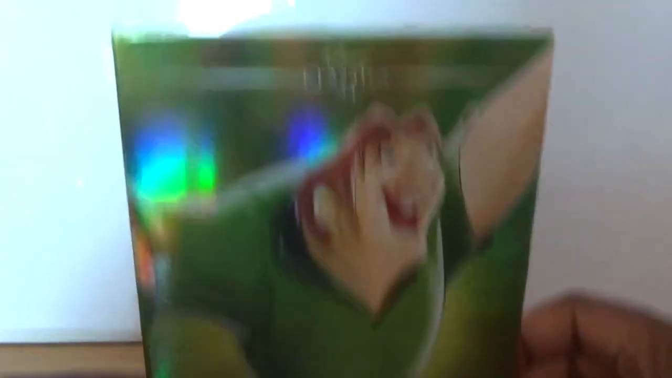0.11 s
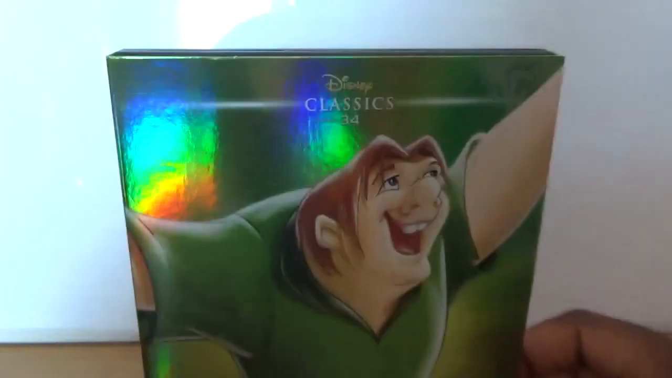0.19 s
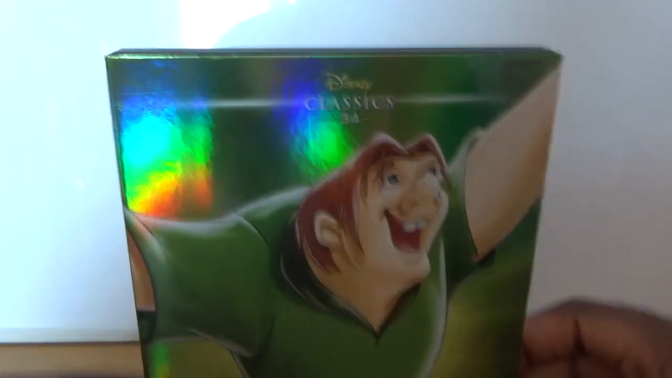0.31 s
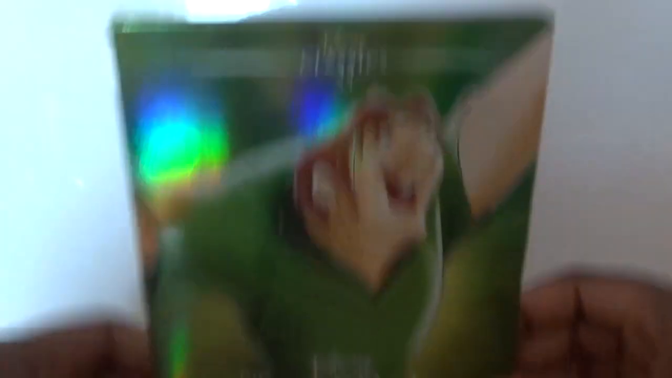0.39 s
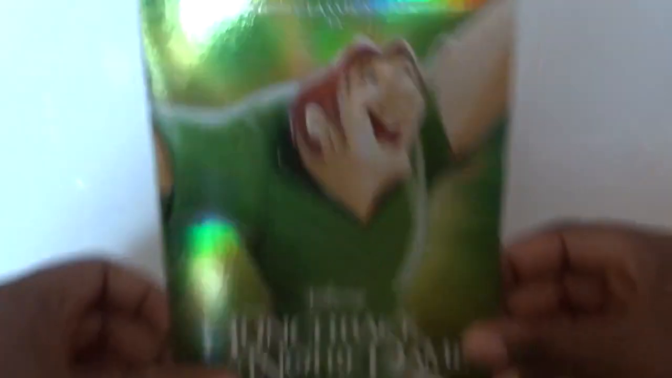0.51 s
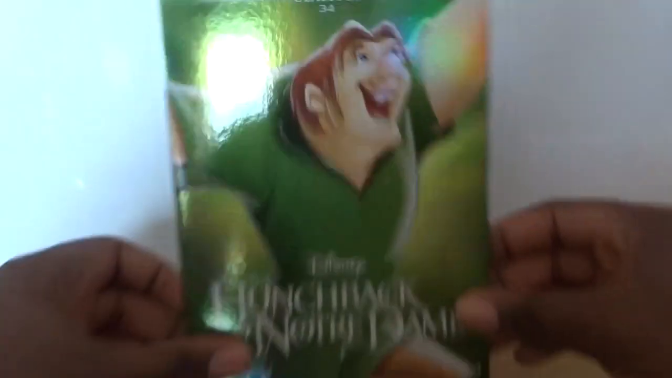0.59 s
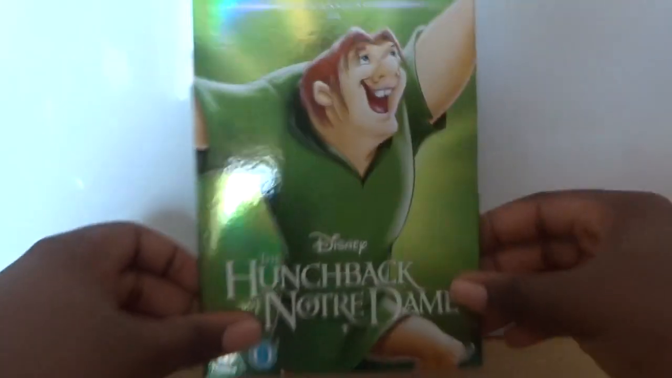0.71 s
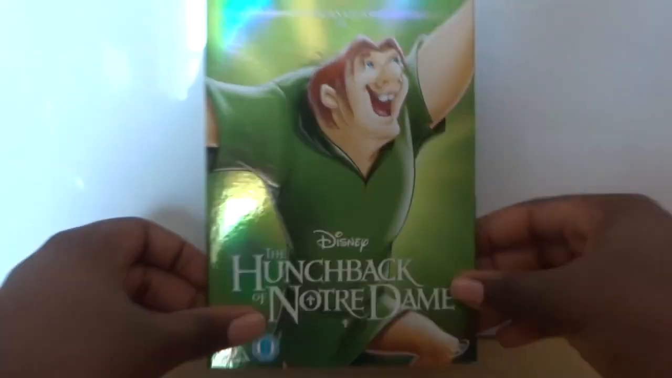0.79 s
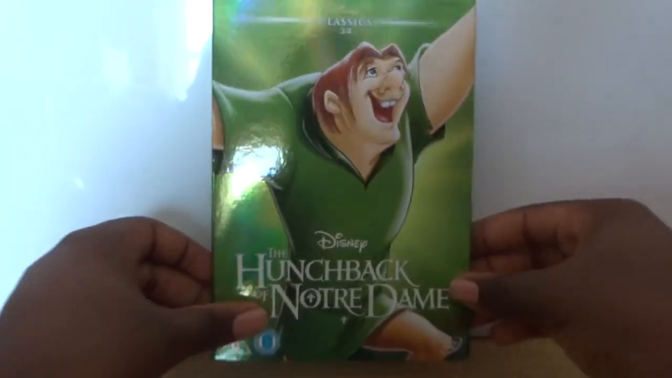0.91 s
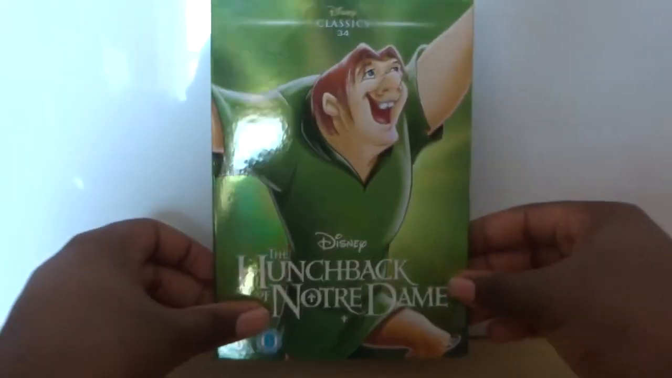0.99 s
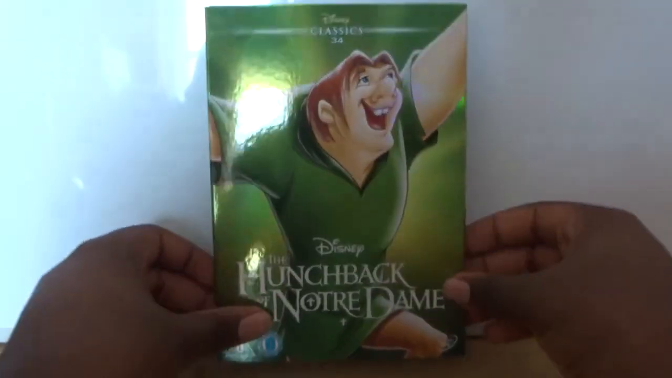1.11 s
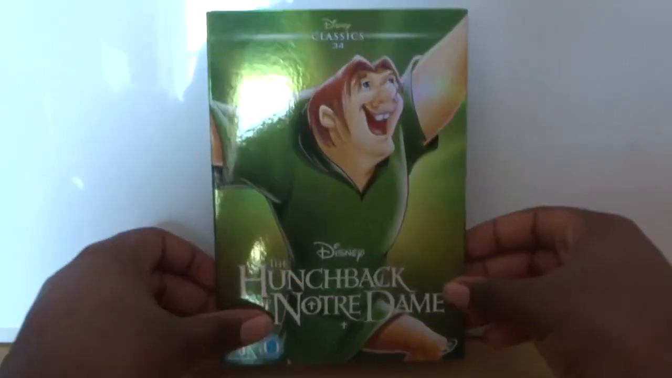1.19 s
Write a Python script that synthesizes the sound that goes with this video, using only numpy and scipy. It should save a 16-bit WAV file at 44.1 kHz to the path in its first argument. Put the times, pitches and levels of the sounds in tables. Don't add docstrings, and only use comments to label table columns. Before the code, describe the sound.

A plastic case slides into a cardboard sleeve from 0 to 0.22 s, a gritty hiss with hollow card shaking and brief squeaky edges. Hard bumps at 0.2 s lead to a loud knock on the table at 0.22 s, with clicking, rattling bounces until 0.4 s. Soft rubs fade; a finger tap comes at 0.9 s, tiny ticks at 1.0-1.2 s, over faint fan and room air, close microphone.

```python
import sys
import numpy as np
from scipy import signal
from scipy.fft import rfft, irfft
from scipy.io import wavfile
from scipy.ndimage import uniform_filter1d

SR = 44100
rng = np.random.default_rng(int(sys.argv[2]) if len(sys.argv) > 2 else 0)


def boost(x):
    u = np.asarray(x, float) / 20
    return 10 ** u


def put_to_file(sound):
    columns = np.atleast_2d(sound).T
    safe = np.clip(columns, -1, 1)
    whole_steps = np.round(safe * 32767)
    wavfile.write(sys.argv[1], SR, whole_steps.astype(np.int16))


N = 57330
T = np.arange(N) / SR

# frequency in Hz, level in dB per Hz.
AIR_COLOUR = [(15, -58.5), (25, -15), (138, 5.5), (703, -2), (884, -2.5), (1230, -7), (1510, -7.5),
              (2390, -15.5), (11000, -18), (14300, -62), (22000, -120)]
# frequency in Hz, level in dB, width in Hz.
FAN_BANDS = [(1476, -73, 42), (2110, -81.5, 30), (3280, -84, 180)]
# frequency in Hz, t60 in seconds, level in dB.
ROOM_BANDS = [(149.6, 0.73, -27.5), (397, 0.65, -31), (1080, 0.39, -9), (2482, 0.53, -9.5),
              (5500, 0.45, -8), (9500, 0.45, -7)]
# start in seconds, boom in dB, deep thud in dB.
TABLE_PUSHES = [
    (0.222, -29.5, -76),
    (0.308, -57.5, -47),
    (0.892, -54, -61),
    (0.922, -45, -59),
    (1.03, -79, -60),
    (1.189, -74, -66),
    (1.269, -54, -59),
    (1.285, -53.5, -66),
]
# frequency in Hz, level in dB, t60 in seconds.
TABLE_BOOM = [(130, 0.0013, 0.2)]
# frequency in Hz, level in dB, t60 in seconds.
TABLE_SWELL_MODES = [(116.4, -42.5, 0.08)]
# frequency in Hz, level in dB, t60 in seconds.
DEEP_THUD = [(45.74, -7, 0.12), (85, 1.5, .1)]
# start in seconds, peak in dB, pitch in Hz, t60 in seconds.
FINGER_TICKS = [(.361, -49, 4550, .1), (.783, -55.5, 1520, .029), (.893, -47, 3550, .018),
                (.8931, -35, 700, .012), (.8944, -40, 1400, .012), (.8945, -40, 720, .01),
                (.8952, -46, 5500, .012), (.8952, -46, 7330, .009), (.8954, -45, 10000, .012),
                (.8953, -48, 8600, .008), (.9, -34, 430, .0085), (.902, -49, 2200, .042),
                (.9826, -46, 1100, .006), (.9826, -48, 4200, .003), (.9827, -51, 2000, .0047),
                (.9832, -55, 3100, .019), (1.11, -55, 2234, .034), (1.11, -56, 6720, .016),
                (1.111, -58, 8600, .02), (1.113, -61, 4380, .02), (1.119, -57, 2170, .04),
                (1.1433, -46, 6200, .0017), (1.1434, -44, 4220, .0018), (1.1435, -46, 9300, .0016),
                (1.144, -58, 690, .027), (1.183, -46, 3930, .007), (1.1835, -56, 10000, .0036),
                (1.1847, -45, 6000, .0026), (1.217, -62, 3600, .0081)]
# start in seconds, peak in dB, pitch in Hz, t60 in seconds.
LID_CLICKS = [(.2488, -38, 3680, .035), (.2495, -39, 3050, .03), (.2535, -45, 4550, .05),
              (.2762, -35, 5500, .008), (.2765, -38, 3300, .015), (.277, -44, 9700, .006),
              (.2772, -45, 7900, .005), (.2775, -48, 10900, .008), (.279, -36, 2450, .035),
              (.2965, -38, 3700, .04), (.3, -37, 2900, .025), (.302, -41, 5600, .008),
              (.316, -43, 3000, .03), (.317, -44, 4800, .006), (.343, -49, 6600, .005),
              (.348, -47, 4500, .025), (.352, -41, 3700, .05), (.353, -41, 2950, .04)]
# start in seconds, length in seconds, level in dB.
FINGER_RUBS = [
    (.8945, 0.031, -50.5),
    (1.3, 0.081, -66.5),
    (0.56, 0.164, -76.5),
    (0.24, 0.039, -54),
    (0.35, 0.24, -62.5),
]
# frequency in Hz, level in dB per Hz.
RUB_COLOUR = [(180, -41), (300, -12), (437, -2), (698, 0), (1500, -9.5), (1620, -12), (3100, -19.5),
              (4010, -15.5), (11000, -23.5), (14300, -51.5), (22000, -120)]
# frequency in Hz, level in dB, t60 in seconds.
CARD_MODES = [(670, -36, .03), (2070, -45.5, 0.085), (3160, -36, 0.026)]
# start in seconds, length in seconds, first pitch in Hz, last pitch in Hz, level in dB.
SINGING_EDGES = [(0, .03, 2750, 2900, -47), (.022, .055, 3450, 3550, -45), (.075, .03, 3000, 2750, -49),
                 (.09, .07, 3900, 6300, -50), (.104, .02, 3700, 3700, -47), (.118, .03, 7600, 7900, -50),
                 (.133, .03, 3750, 3500, -47), (.155, .05, 2900, 3250, -47), (.202, .02, 3300, 3000, -41),
                 (.203, .02, 6500, 6100, -42), (.204, .018, 8600, 8800, -47), (.385, .06, 4550, 4550, -63),
                 (.39, .045, 5150, 5150, -64), (.41, .08, 2600, 2580, -59), (.896, .03, 330, 300, -56),
                 (.901, .017, 2250, 2100, -57), (.906, .028, 3150, 3150, -56), (.916, .016, 720, 680, -51),
                 (.935, .008, 3600, 3600, -63)]
# start in seconds, level in dB, contact in ms, crack in dB.
LANDINGS = [(0.2215, -15, 0.5, -54), (0.2244, -19, 0.89, -60), (.2335, -37, 0.68, -61),
            (.2488, -25.5, 0.3, -48), (.261, -25.5, 0.49, -55), (0.2757, -39.5, 0.53, -29.5),
            (0.296, -35.5, 0.34, -30), (0.3064, -38.5, 1.46, -60), (.316, -43, 0.32, -38),
            (0.342, -36.5, 2.07, -38), (.352, -36.5, 0.4, -41.5), (0.3972, -54.5, .4, -45),
            (.575, -58, 0.73, -59), (.615, -59, 0.56, -58.5)]
# frequency in Hz, level in dB, t60 in seconds.
BODY_MODES = [(266, 2, 0.077), (301, -4, 0.068), (339.3, -2, 0.095), (511, -6, 0.058), (384.5, 2.5, 0.047),
              (679, -7.5, 0.044), (600.5, 0.5, 0.051), (713, -13.5, 0.23), (783, -5, 0.1), (846, -13, 0.13),
              (930, -15.5, .07), (1100, -8, 0.071), (1338, -8.5, 0.036), (1830, -20, 0.11)]
# start in
# seconds, level in dB, contact in ms.
MOUTH_BUMPS = [
    (0.1959, -23, 0.82),
    (0.1982, -10, 2),
    (.2045, -22.5, 0.36),
    (0.207, -11.5, 0.6),
    (0.2102, -11, 1.3),
    (0.2234, -17, 0.45),
]
# frequency in Hz, level in dB, t60 in seconds.
HELD_MODES = [(270, 0, .022), (390, -8, .02), (620, -4, .022), (1100, -16, .02), (1800, -14, .015)]
# frequency in Hz, level in dB per Hz.
CRACK_COLOUR = [(600, 14), (1500, 18), (3500, 5), (6000, -8.5), (11000, -16)]
# frequency in Hz, level in dB, t60 in seconds.
LID_MODES = [(2640, -55.5, 0.1), (3000, -46.5, .05), (3700, -40, 0.049), (4780, -52, 0.06),
             (5730, -46.5, .03)]
# time in seconds, level in dB, sleeve drive in dB, brightness in dB.
SLIDE_EFFORT = [
    (0, -36.5, -1, -7),
    (0.029, -40, 2, -0.5),
    (.06, -39, 3.5, 2.5),
    (0.109, -39, -1, 1),
    (0.15, -41.5, 4.5, 1.5),
    (0.193, -40, 1, 3),
    (0.211, -36, -8.5, -2.5),
    (0.2228, -35.5, -13.5, -4),
]
# frequency in Hz, level in dB per Hz.
HISS_COLOUR = [(410, -2), (700, 0.5), (832, 1), (1010, -8.5), (1320, -3.5), (1640, -6.5), (3560, -5),
               (7700, -8), (11000, -17.5), (14300, -73.5), (22000, -120)]
# frequency in Hz, level in dB, t60 in seconds.
SLEEVE_MODES = [(224, -13, .07), (269, 6.5, 0.098), (345, 1.5, 0.23), (351, 2.5, 0.068), (575, -3, 0.14),
                (583, 1.5, 0.022), (770, -27.5, .05), (1290, -11.5, 0.054)]
# frequency in Hz, level in dB, t60 in seconds.
EDGE_MODES = [(2973, 1, 0.011), (3500, -0.18, 0.015), (3770, 2, 0.013)]

RADIATE_HZ = 198
LEFT_RIGHT = np.array([[1], [-1]])


def unit(x):
    return x / np.sqrt(np.mean(x ** 2))


def cut(x, hz, kind, order=2):
    return signal.sosfilt(signal.butter(order, hz, kind, fs=SR, output="sos"), x)


def colour(x, points):
    hz, db = np.array(points, float).T
    f = np.maximum(np.arange(N // 2 + 1) * SR / N, 1)
    low_fall_db = -24 * np.maximum(np.log2(hz[0] / f), 0)
    gain = boost(np.interp(np.log(f), np.log(hz), db) + low_fall_db)
    return unit(irfft(rfft(x) * gain, N))


def ring(x, modes):
    out = 0
    for k, (hz, db, t60) in enumerate(modes):
        pole = np.exp((2j * np.pi * hz - np.log(1000) / t60) / SR)
        tone = signal.lfilter([1], [1, -pole], x + 0j).imag
        out = out + (-1) ** k * boost(db) * tone
    return out


def push(at_s, length_s):
    u = np.clip((T - at_s) / length_s, 0, 1)
    return np.sin(np.pi * u) ** 2 * 2 / (length_s * SR)


def fade(at_s, t60):
    return (T >= at_s) * np.exp(-np.log(1000) * np.maximum(T - at_s, 0) / t60)


def walk(rate):
    k = int(SR / rate)
    return unit(uniform_filter1d(uniform_filter1d(rng.standard_normal(N), k), k))


def grit(scatter_db):
    return rng.standard_normal(N) * boost(scatter_db * np.minimum(rng.exponential(size=N), 5))


def air():
    both = []
    for _ in range(2):
        x = boost(-63 + 0.79 * walk(5.4)) * colour(rng.standard_normal(N), AIR_COLOUR)
        for hz, db, width in FAN_BANDS:
            t60 = np.log(1000) / (np.pi * width)
            band = unit(ring(rng.standard_normal(N), [(hz, 0, t60)]))
            x = x + boost(db - 3 * walk(29)) * band
        both.append(x)
    side = signal.lfilter(*signal.butter(1, 60, "high", fs=SR), both[1])
    return both[0] + boost(0.5) * side * LEFT_RIGHT


def room(x):
    tail = np.zeros((2, N))
    for hz, t60, db in ROOM_BANDS:
        band = [(hz / 1.7, -9), (hz, 0), (hz * 1.7, -9), (hz * 4, -40)]
        shape = fade(0.0097, t60) * boost(db) / np.sqrt(SR * t60)
        tail += [shape * colour(rng.standard_normal(N), band) for _ in range(2)]
    mid, side = signal.fftconvolve(x[None], tail, axes=1)[:, :N]
    return mid + boost(-6) * side * LEFT_RIGHT


def table():
    boom_force = sum(boost(db) * push(s, 0.0019) for s, db, _ in TABLE_PUSHES)
    thud_force = sum(boost(db) * push(s, .006) for s, _, db in TABLE_PUSHES)
    boom = ring(ring(boom_force, TABLE_SWELL_MODES), TABLE_BOOM)
    return cut(boom, 80, "high") + ring(thud_force, DEEP_THUD)


def fingers():
    rough = rng.standard_normal(N)
    ticks = 0
    for s, db, hz, t60 in FINGER_TICKS + LID_CLICKS:
        scrape = boost(-11) * fade(s, t60) * rough / np.sqrt(SR * t60 / 50)
        ticks = ticks + ring(push(s, .00007) + scrape, [(hz, db, t60)])
    drag = 0
    for s, length_s, db in FINGER_RUBS:
        u = np.clip((T - s) / length_s, 0, 1)
        drag = drag + boost(db) * np.minimum(12 * u, 1) * (1 - u ** 3)
    grains = drag * grit(2.9) * boost(1.5 * walk(150))
    return ticks + ring(grains, CARD_MODES) + drag * colour(grit(2.0), RUB_COLOUR)


def singing():
    out = 0
    for s, length_s, from_hz, to_hz, db in SINGING_EDGES:
        u = np.clip((T - s) / length_s, 0, 1)
        phase = 2 * np.pi * np.cumsum(from_hz + (to_hz - from_hz) * u) / SR
        a, b = cut(rng.standard_normal((2, N)), .06 * from_hz + 10, "low")
        band = np.sin(np.pi * u) ** .6 * (a * np.cos(phase) + b * np.sin(phase))
        out = out + boost(db) * band / np.sqrt(np.sum(band ** 2) / (length_s * SR))
    return out


def knocks():
    force = sum(-boost(db) * push(s, ms / 1000) for s, db, ms, _ in LANDINGS)
    rattle_level = sum(boost(db) * fade(s, 0.099) for s, db, _, _ in LANDINGS)
    rattle = rattle_level * unit(cut(grit(0.91), 2000, "low", order=6))
    body = ring(force + boost(-40) * rattle, BODY_MODES) + boost(-11.5) * rattle
    bump_force = sum(-boost(db) * push(s, ms / 1000) for s, db, ms in MOUTH_BUMPS)
    bumps = ring(bump_force, HELD_MODES)
    crack = 0
    for s, _, _, db in LANDINGS:
        rise = np.clip((T - s) / 0.0036, 0, 1)
        crack = crack + boost(db) * fade(s, 0.056) * rise
    crack = crack * colour(grit(1.8), CRACK_COLOUR)
    return cut(body + bumps, RADIATE_HZ, "high", order=3) + crack + ring(crack, LID_MODES)


def slide():
    s, db, drive_db, bright_db = np.array(SLIDE_EFFORT).T
    stop_s = 0.0009
    moving = np.clip((s[-1] - T) / stop_s, 0, 1)
    after = boost(-23) * fade(s[-1] - stop_s, .12)
    effort = boost(np.interp(T, s, db)) * (moving + after)
    hiss, edge = (colour(grit(1.5) * boost(1.2 * walk(90)), HISS_COLOUR) for _ in range(2))
    dull = cut(hiss, 4800, "low", order=1)
    bright = boost(np.interp(T, s, bright_db))
    edge_song = boost(-19.5) / bright ** 2 * unit(ring(hiss, EDGE_MODES))
    hiss = dull + bright * (hiss - dull) + edge_song
    sleeve = ring(grit(5.6) * boost(7.0 * walk(82)), SLEEVE_MODES)
    sleeve = unit(cut(sleeve, RADIATE_HZ, "high", order=4))
    sleeve = boost(2 + np.interp(T, s, drive_db)) * sleeve
    rumble = boost(-21.5) * unit(cut(rng.standard_normal(N), 240, "low"))
    return effort * (hiss + sleeve + rumble), effort * boost(-11) * edge


def pan(x, db):
    return x * boost(np.array([[db / 2], [-db / 2]]))


def scene():
    drag, edge = slide()
    hits = knocks() + table()
    hand = fingers() + singing()
    near = pan(drag, 0) + edge * LEFT_RIGHT + pan(hits, -2) + pan(hand, 0.5)
    return near + room(drag + hits + hand) + air()


def band_limit(x):
    return signal.sosfilt(signal.butter(12, 11440, fs=SR, output="sos"), x)


def record(dry):
    top = signal.sosfilt(signal.ellip(10, .3, 45, 11150, fs=SR, output="sos"), dry)
    return band_limit(top)


dry = scene()
out = record(dry)
put_to_file(out)
```